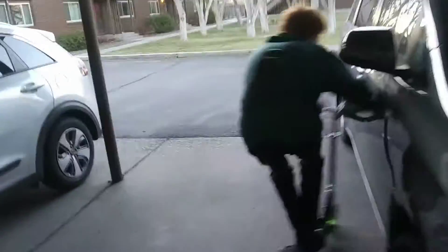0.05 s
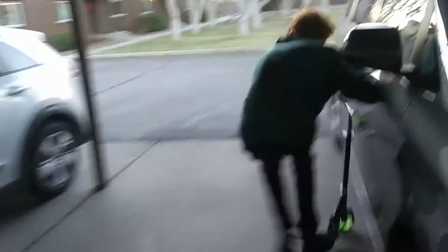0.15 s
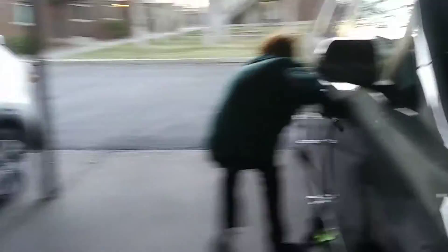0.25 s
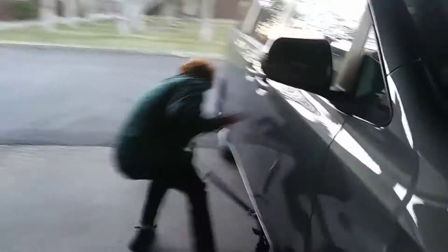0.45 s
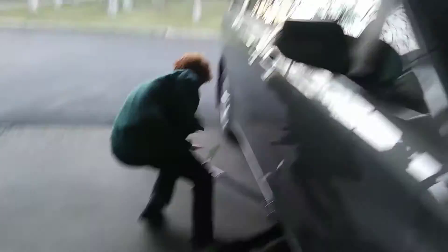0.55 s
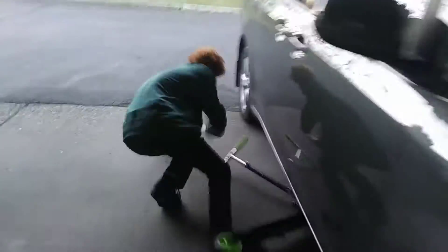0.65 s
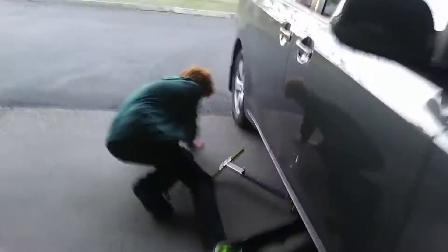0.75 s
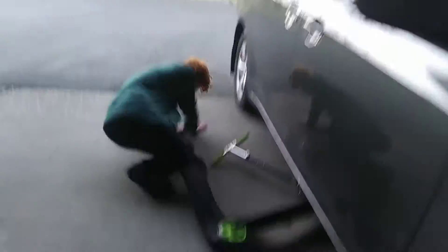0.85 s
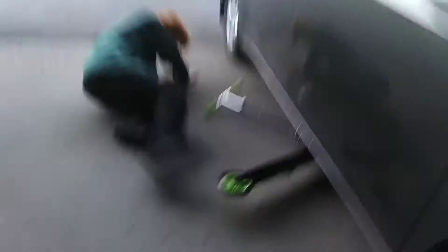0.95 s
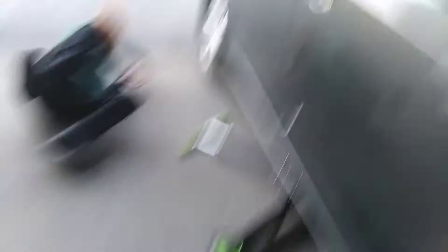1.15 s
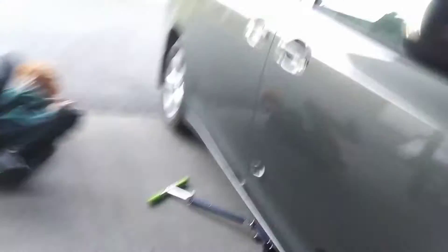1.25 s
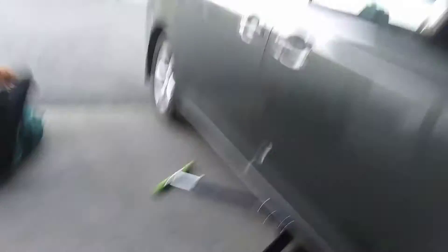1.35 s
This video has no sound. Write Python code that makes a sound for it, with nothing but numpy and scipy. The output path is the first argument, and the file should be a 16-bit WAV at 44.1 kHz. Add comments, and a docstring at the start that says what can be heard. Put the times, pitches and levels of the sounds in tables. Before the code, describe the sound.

A metal scooter knocks against a car and crashes onto concrete with two ringing clangs.

```python
"""A carport: a metal kick scooter rolls into a parked car, slides down its side and crashes on the concrete.
The door panel booms, the deck scrapes and lands, then the handlebar slams down. Each crash is a gritty
burst of noise with clear metal modes on top, ringing on between car, floor and roof. Dull knocks and a
few dry, close ticks fall in between, and a limiter holds the loudest blows down."""
import sys
import numpy as np
from scipy import signal
from scipy.io import wavfile
from scipy.ndimage import uniform_filter1d

SR = 44100
rng = np.random.default_rng(int(sys.argv[2]) if len(sys.argv) > 2 else 0)


def wav_out(sig):
    """Save sig, one row per channel (or a flat mono array), as 16-bit PCM at SR to the path in sys.argv[1]."""
    wavfile.write(sys.argv[1], SR, np.round(np.clip(np.atleast_2d(sig).T, -1, 1) * 32767).astype(np.int16))


N = 61739
TIME = np.arange(N) / SR
BAND_EDGES_HZ = 35 * 2 ** (np.arange(37) / 4)
BAND_CENTRES_HZ = np.sqrt(BAND_EDGES_HZ[1:] * BAND_EDGES_HZ[:-1])

# noise colours of the outdoor air, the wheels and each kind of contact: f/Hz, level/dB (density)
AIR_COLOUR = [(40, -27), (130, 0), (300, 1.5), (1000, -4), (2500, -5.5), (7000, -8), (15000, -28)]
WHEEL_COLOUR = [(60, -14), (150, -1.5), (220, -7.5), (300, 3.5), (420, 1), (600, -8.5), (900, -5.5),
                (1400, -22), (4000, -31), (15000, -44)]
KNOCK_COLOUR = [(100, -28), (350, 14), (600, 15), (1050, 20.5), (1500, 9), (2000, 16), (3000, -13),
                (7000, -6), (15000, -57)]
SCRAPE_COLOUR = [(150, -37), (300, -48), (550, -46), (900, 7), (1400, 0.5), (2000, 3.5), (2800, 6.5),
                 (3400, -2.5), (4600, 3), (7000, -8), (10000, -21), (15500, -44)]
PANEL_COLOUR = [(150, -24), (215, -12.5), (290, -11.5), (460, -7), (670, 2), (850, 0.5), (1200, -0.5),
                (1600, -1.5), (2200, 0), (3500, -9.5), (7200, -13), (10000, -25.5), (15500, -36.5)]
DECK_COLOUR = [(150, -35), (300, -22), (600, -10.5), (880, -0.5), (1200, 1.5), (1550, -3.5), (2100, 1.5),
               (2800, -1), (3500, -6), (5000, -0.5), (7200, -0.5), (10000, -15.5), (15500, -27.5)]
BAR_COLOUR = [(150, -29), (300, -28), (500, -18), (800, -8), (1100, 1.5), (1550, -8.5), (1950, 2),
              (2350, -21.5), (2800, -8), (3400, -13.5), (4200, -14), (4900, -12), (7200, -13.5),
              (10000, -30.5), (13000, -32.5), (15500, -45)]
# reverb time of the carport: f/Hz, t60/s
CARPORT_T60 = [(100, 0.51), (300, 1.83), (1000, 1.0), (3000, 0.83), (7000, 0.53), (15000, 0.61)]

# dry ticks close to the microphone: t/s, level/dB, low edge f/Hz, high edge f/Hz
TICK_CUES = [(0.7932, 0, 680, 1940), (0.9906, -20.5, 700, 2150), (1.2979, -14.5, 565, 1710)]
# cracks of first contact: t/s, level/dB, stereo width/0-1
CRACK_CUES = [(0.066, -29, 0.54), (0.085, -32.5, 0.7), (0.221, -19.5, 0), (0.2296, -20, 0),
              (0.253, -11.5, 0), (0.282, -29, 0), (0.5783, -12.5, 0.62), (0.589, -18.5, 0.66),
              (1.0344, -18, 0.37), (1.0515, -3.5, 0)]
# squeaks of metal dragged on concrete: t/s, level/dB, length/s
SQUEAK_CUES = [(0.4896, -12.5, 0.0017), (0.5002, -7.5, 0.0029)]
# blows of rubber and shoes, scraping deck, door, landing deck, handlebar: t/s, level/dB, tilt/(dB/octave)
KNOCK_HITS = [(0.799, -37.5, -15.5), (0.822, -36, 11.5), (0.876, -35.5, -2.5), (0.964, -37.5, 0),
              (0.990, -24, 1.5), (1.299, -35, -1)]
SCRAPE_HITS = [(0.4872, -20.5, 6.5), (0.499, -18, 0.5), (0.5105, -15.5, 0.5), (0.524, -22, -5)]
PANEL_HITS = [(0.066, -28.5, 3.5), (0.2205, -22, 4), (0.231, -19.5, -4), (0.253, -12.5, 1.0),
              (0.265, -13.5, -4.5), (0.279, -18, -4), (0.318, -17.5, -2), (0.356, -21, 1.2),
              (0.378, -24.5, 0), (0.408, -32, 3.5), (0.468, -30, 2.5)]
DECK_HITS = [(0.579, -9, -1), (0.592, -8.5, 0), (0.618, -10, -0.5), (0.652, -16.5, -3.5), (0.778, -35, 9),
             (0.815, -41, 12), (0.868, -39, 4.5)]
BAR_HITS = [(1.035, -4.5, 1), (1.05, -16, -4), (1.074, -18, -1), (1.203, -43, 9), (1.239, -42.5, 8)]

# clear modes of frame tube, door panel, deck and handlebar: f/Hz, level/dB, t60/s
TUBE_MODES = [(1087, 3, 1.2), (2062, -1, 1.1), (2272, -1, 1), (2821, -3, .9), (4113, -2, 1),
              (4915, -3, .95), (5760, -3, 1), (7418, -6, .8)]
PANEL_MODES = [(278, -11, .36), (388, -9, .45), (550, -5, .35), (635, -3, .4), (691, 0, .36), (792, -9, .3),
               (1056, -7, .45), (1262, -7, .35), (1870, -7, .4), (2017, -10, .45)]
DECK_MODES = [(912, -8, .28), (1108, -2, .36), (1189, 0, .38), (1259, -1, .42), (1322, -7, .35),
              (1387, -7, .35), (1818, -7, .33), (2022, -7, .35), (4489, -4, .3), (4779, -6, .3),
              (5017, -5, .26), (7085, -6, .25)]
BAR_MODES = [(1008, -1, .36), (1117, 1, .46), (1244, 0, .34), (1437, -5, .33), (1819, -4, .33),
             (1888, 0, .3), (1947, 0, .38), (2068, -5, .34), (2519, -8, .29), (2662, 2, .26),
             (2916, 0, .35), (2945, -4, .3), (3553, -7, .38), (4760, -3, .27), (7139, -8, .22)]


def from_db(db):
    """Decibels to amplitude."""
    return 10 ** (np.asarray(db) / 20)


def per_band(table):
    """Read a table at the band centres, on a log-frequency axis."""
    hz, values = np.transpose(table)
    return np.interp(np.log(BAND_CENTRES_HZ), np.log(hz), values)


def decay(age, t60):
    """Amplitude that falls 60 dB in t60."""
    return np.exp(-np.log(1000) * age / t60)


def band_noise(low_hz, high_hz):
    """Band-passed noise of rms 1."""
    bandpass = signal.butter(2, [low_hz, high_hz], "band", fs=SR, output="sos")
    noise = signal.sosfilt(bandpass, rng.standard_normal(N + SR // 10))[-N:]
    return noise / noise.std()


def noise_bank():
    """Quarter-octave bands of noise."""
    return np.array([band_noise(low, high) for low, high in zip(BAND_EDGES_HZ, BAND_EDGES_HZ[1:])])


def band_gains(colour, tilt_db=0):
    """Band gains of total power 1 for a colour, brightened by tilt_db per octave."""
    gains = from_db(per_band(colour) + tilt_db * np.log2(BAND_CENTRES_HZ)) * np.sqrt(BAND_CENTRES_HZ)
    return gains / np.linalg.norm(gains)


def clatter(hits, colour, t60, tail_db, attack_s=0.0015, grit_s=0.001, grit_db=1):
    """Each blow sets off a short, gritty wash of countless modes and a longer tail under the roof."""
    tail = from_db(tail_db) * decay(TIME, per_band(CARPORT_T60)[:, None])
    attack = 1 - np.exp(-TIME / attack_s)
    hit_power = (decay(TIME, t60) ** 2 + tail ** 2) * attack ** 2
    power = np.zeros_like(hit_power)
    for t, db, tilt_db in hits:
        start = int(t * SR)
        gains = from_db(db) * band_gains(colour, tilt_db)
        power[:, start:] += gains[:, None] ** 2 * hit_power[:, :N - start]
    flutter = uniform_filter1d(rng.standard_normal(N), int(grit_s * SR))
    grit = from_db(grit_db * flutter / flutter.std())
    wash = (np.sqrt(power) * noise_bank()).sum(0)
    return wash * grit / np.sqrt(np.mean(grit ** 2))


def ringing(hits, modes, level_db, waver_s=0.039, waver_db=2, linewidth_hz=2.51):
    """Each blow feeds energy into the body's clear modes, which waver in level and phase."""
    out = np.zeros(N)
    for hz, mode_db, t60 in modes:
        blows = np.zeros(N)
        for t, db, _ in hits:
            blows[int(t * SR)] += from_db(level_db + db + mode_db) ** 2
        energy = signal.lfilter([1], [1, -decay(1 / SR, t60) ** 2], blows)
        waver = uniform_filter1d(rng.standard_normal(N), int(waver_s * SR), mode="wrap")
        envelope = np.sqrt(energy) * from_db(waver_db * waver / waver.std())
        phase_drift = np.cumsum(rng.standard_normal(N)) * np.sqrt(2 * np.pi * linewidth_hz / SR)
        out += envelope * np.sin(2 * np.pi * hz * TIME + phase_drift)
    return out


def air(level_db=-54.5):
    """A faint, steady bed of outdoor noise."""
    return from_db(level_db) * (band_gains(AIR_COLOUR) @ noise_bank())


def wheels(start_s=0.066, tip_s=0.34, release_s=0.073, level_db=-33):
    """Small hard wheels rumble on concrete until the scooter tips over."""
    gate = (TIME > start_s) * np.exp(-np.maximum(TIME - tip_s, 0) / release_s)
    return from_db(level_db) * gate * (band_gains(WHEEL_COLOUR) @ noise_bank())


def knocks():
    """Rubber and shoes land with dull, quickly damped knocks."""
    return clatter(KNOCK_HITS, KNOCK_COLOUR, t60=0.089, tail_db=-11.5)


def ticks():
    """Close, heavily damped taps, over within a cycle or two."""
    out = np.zeros(N)
    for t, db, low_hz, high_hz in TICK_CUES:
        highpass = signal.butter(3, low_hz, "high", fs=SR, output="sos")
        lowpass = signal.butter(4, high_hz, fs=SR, output="sos")
        impulse = signal.unit_impulse(N, int(t * SR)) + 1e-18
        tap = signal.sosfilt(np.vstack([highpass, lowpass]), impulse)
        out += from_db(db) * tap / np.abs(tap).max()
    return out


def frame_tube():
    """Blows to deck and handlebar leave a thin, long ring in the frame tube."""
    return ringing(DECK_HITS + BAR_HITS, TUBE_MODES, level_db=-33)


def squeaks():
    """A metal edge catches and slips in short bright bursts."""
    gate = np.zeros(N)
    for t, db, length_s in SQUEAK_CUES:
        progress = np.clip((TIME - t) / length_s, 0, 1)
        gate += from_db(db) * np.sqrt(np.abs(np.sin(np.pi * progress)))
    return gate * band_noise(low_hz=4620, high_hz=5920)


def scrape():
    """The deck grates along the ground in a quick run of contacts."""
    return clatter(SCRAPE_HITS, SCRAPE_COLOUR, t60=0.29, tail_db=-7)


def cracks(t60=0.015):
    """Hard contacts open with a bright snap, some centred, some wide."""
    mid = band_noise(low_hz=4640, high_hz=7730)
    side = band_noise(low_hz=4640, high_hz=7730) * np.array([[1], [-1]])
    out = np.zeros((2, N))
    for t, db, width in CRACK_CUES:
        envelope = from_db(db) * (TIME >= t) * decay(np.abs(TIME - t), t60)
        out += envelope * (np.sqrt(1 - width ** 2) * mid + width * side)
    return out


def door_panel():
    """The car door booms as the scooter strikes it and slides down."""
    wash = clatter(PANEL_HITS, PANEL_COLOUR, t60=0.3, tail_db=-17)
    return wash + ringing(PANEL_HITS, PANEL_MODES, level_db=-9.5)


def deck():
    """The metal deck lands on the concrete, rattles and rings."""
    wash = clatter(DECK_HITS, DECK_COLOUR, t60=0.24, tail_db=-15.5)
    return wash + ringing(DECK_HITS, DECK_MODES, level_db=-11.5)


def handlebar():
    """The handlebar slams down with a clang and settles in small bounces."""
    wash = clatter(BAR_HITS, BAR_COLOUR, t60=0.27, tail_db=-18.5)
    return wash + ringing(BAR_HITS, BAR_MODES, level_db=-13)


def scene():
    """The mix: everything sits in the centre, and only the cracks have stereo width."""
    background = air() + wheels() + knocks() + ticks()
    sweeteners = frame_tube() + squeaks() + scrape() + cracks()
    return background + sweeteners + door_panel() + deck() + handlebar()


def record(dry, low_cut_hz=223, high_cut_hz=16000, limit_db=-9, release_db_per_s=83, ceiling=0.73):
    """The microphone drops the bass, a limiter ducks the big blows, peaks are rounded, the top is cut."""
    thinned = signal.sosfilt(signal.butter(4, low_cut_hz, "high", fs=SR, output="sos"), dry)
    power = uniform_filter1d((thinned ** 2).mean(0), int(0.008 * SR))  # 8 ms detector
    over_db = np.maximum(10 * np.log10(np.abs(power) + 1e-12) - limit_db, 0)
    release = release_db_per_s * TIME
    duck_db = np.maximum.accumulate(over_db + release) - release  # grabs at once, lets go steadily
    rounded = ceiling * np.tanh(thinned * from_db(-duck_db) / ceiling)
    return signal.sosfilt(signal.ellip(10, 0.2, 70, high_cut_hz, fs=SR, output="sos"), rounded)


dry = scene()
out = record(dry)
wav_out(out)
```